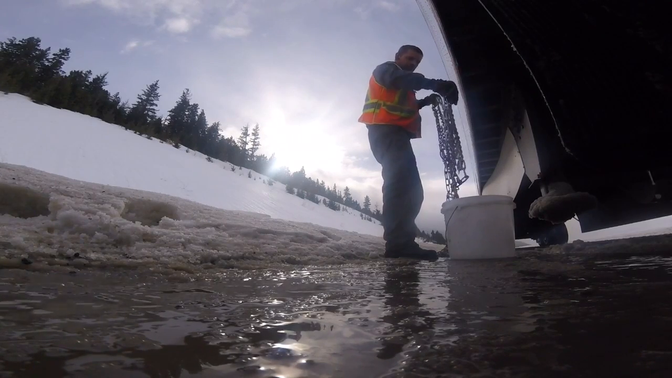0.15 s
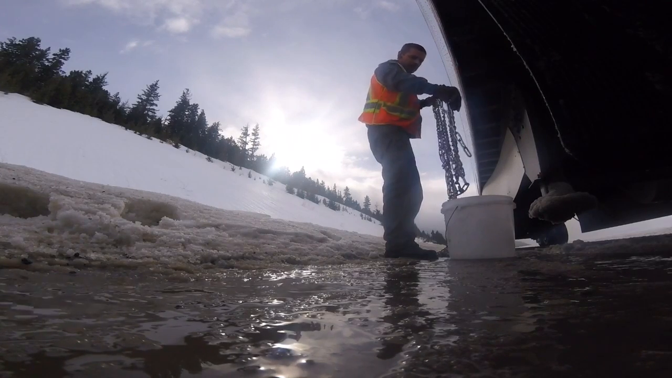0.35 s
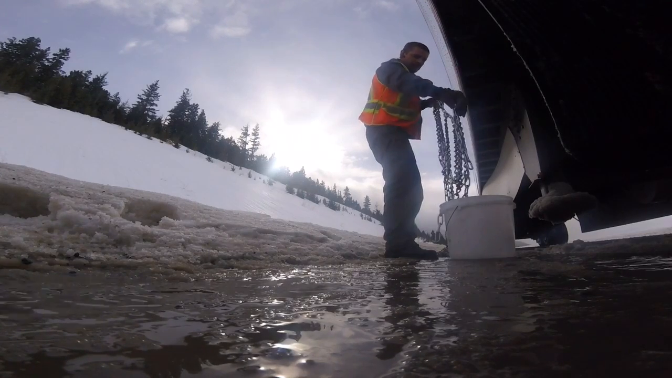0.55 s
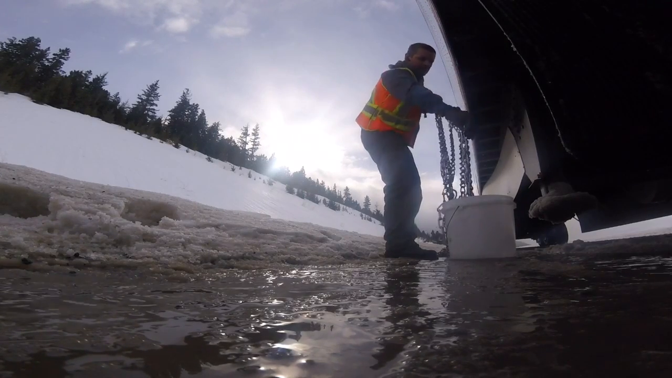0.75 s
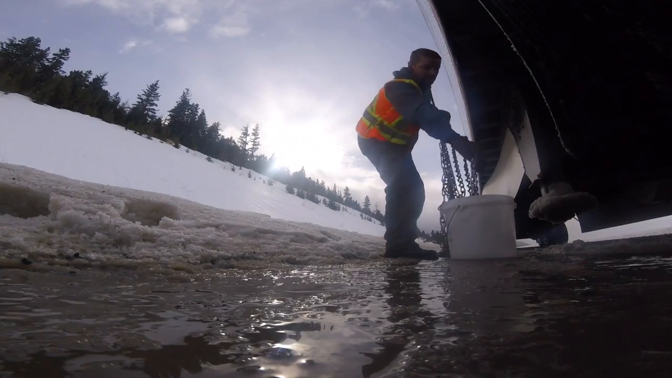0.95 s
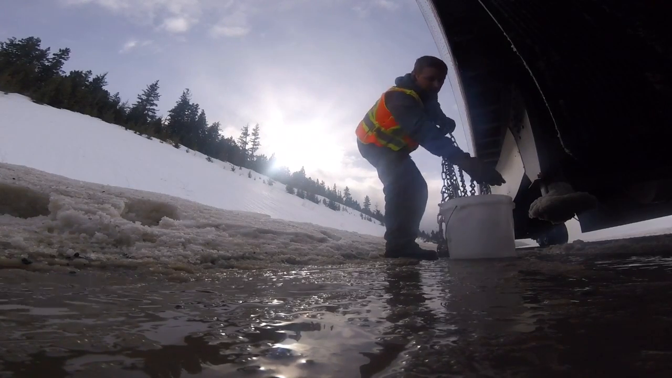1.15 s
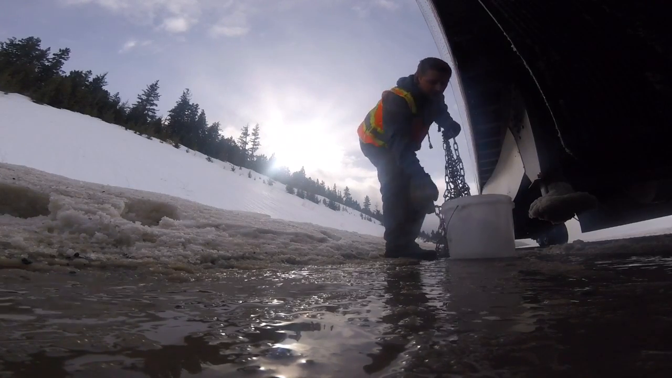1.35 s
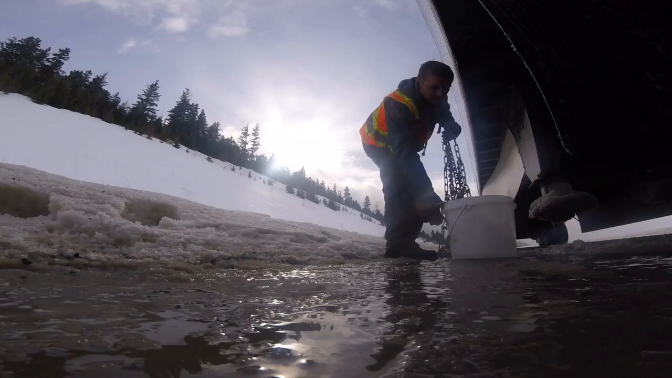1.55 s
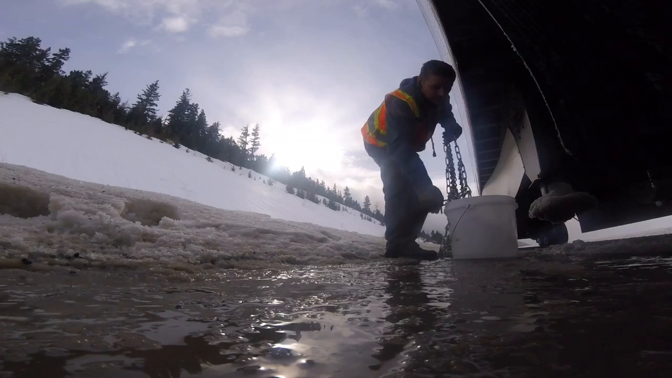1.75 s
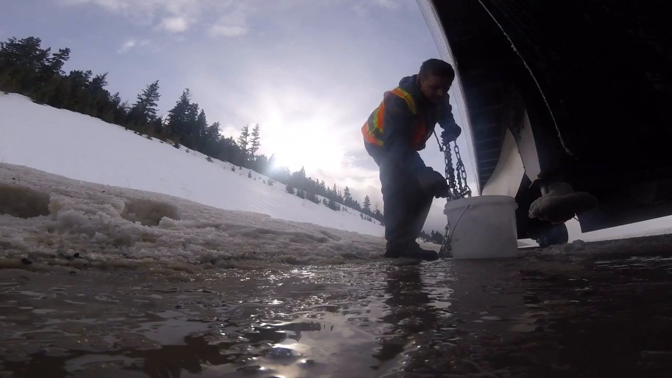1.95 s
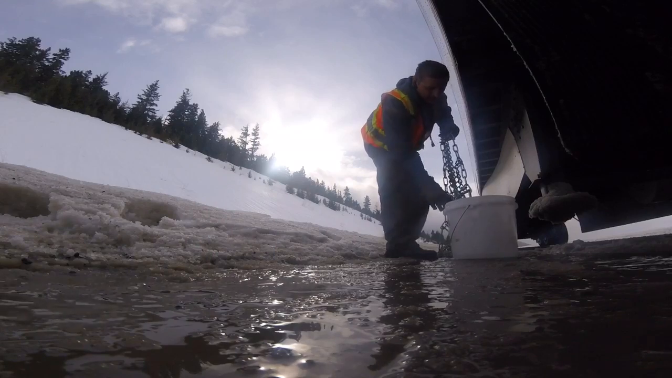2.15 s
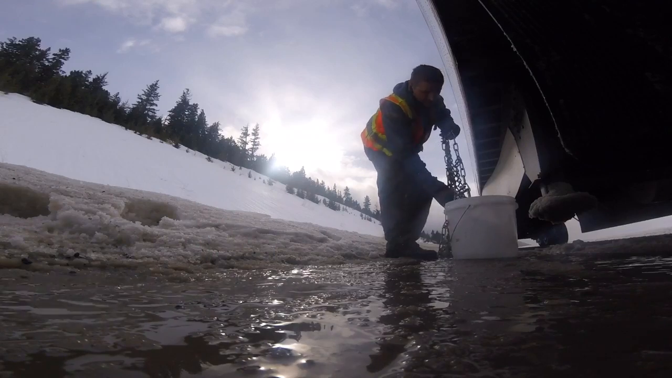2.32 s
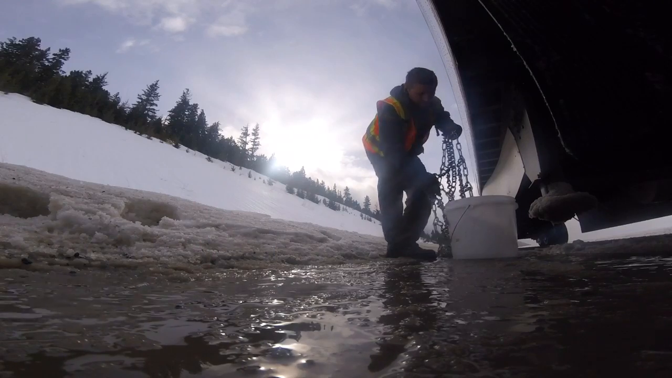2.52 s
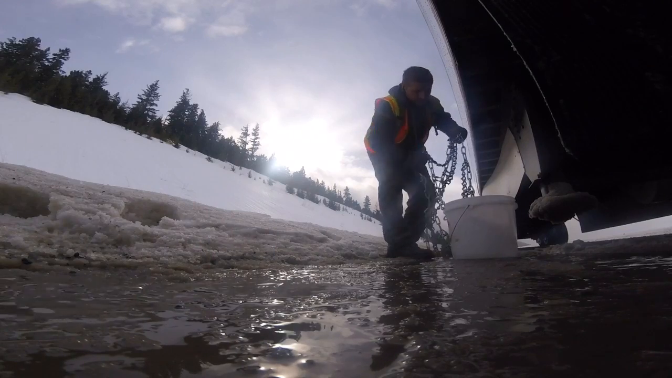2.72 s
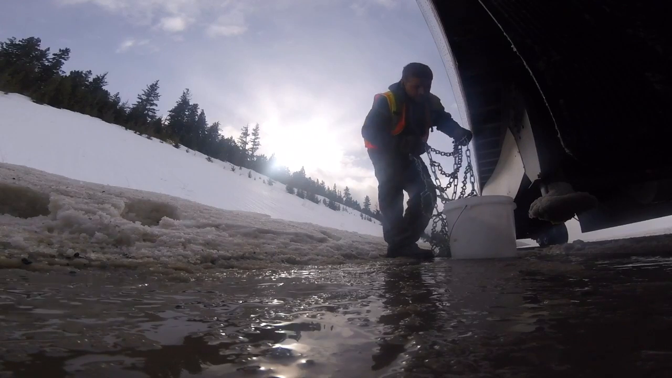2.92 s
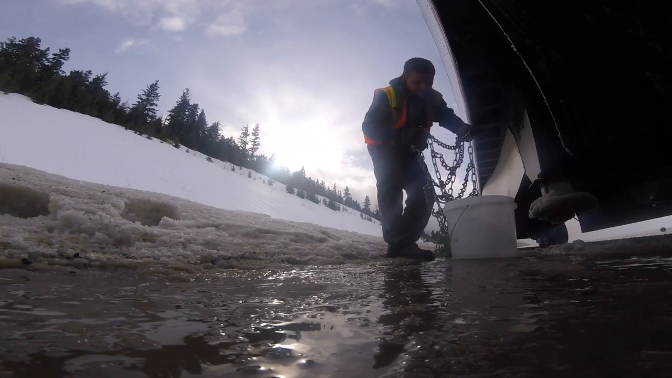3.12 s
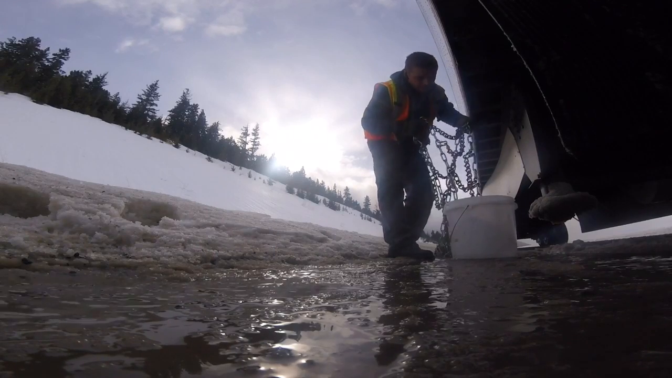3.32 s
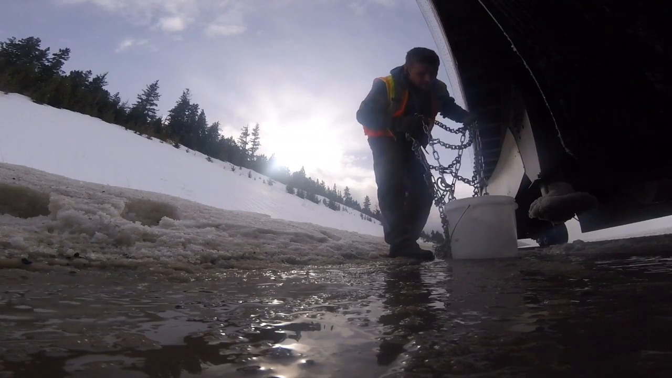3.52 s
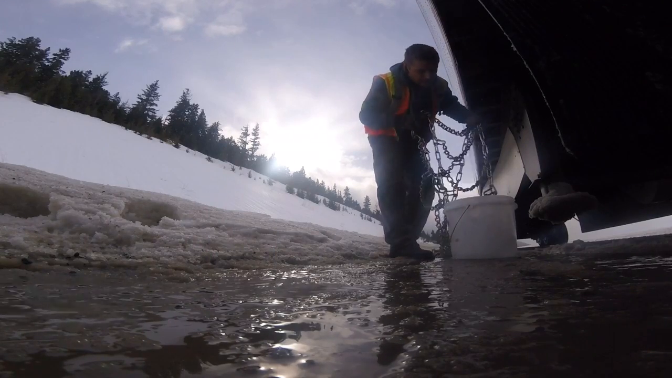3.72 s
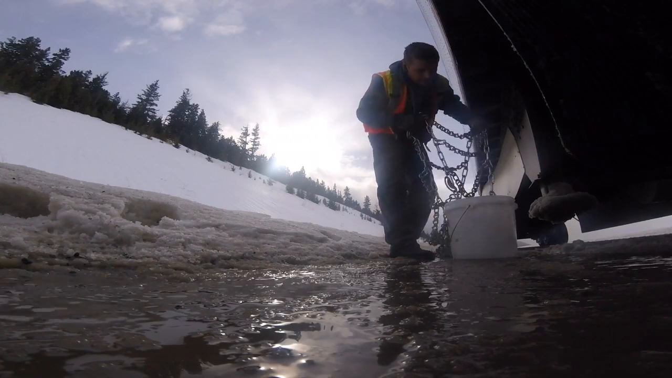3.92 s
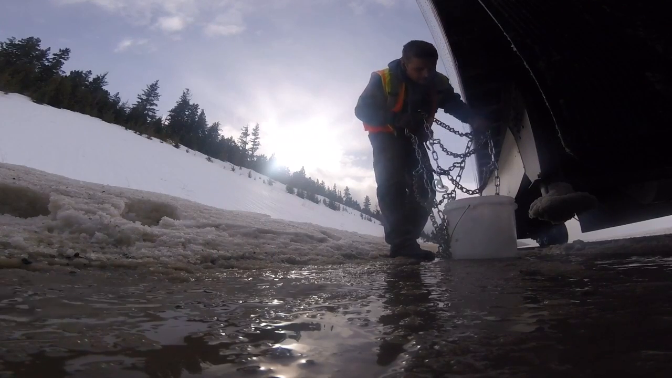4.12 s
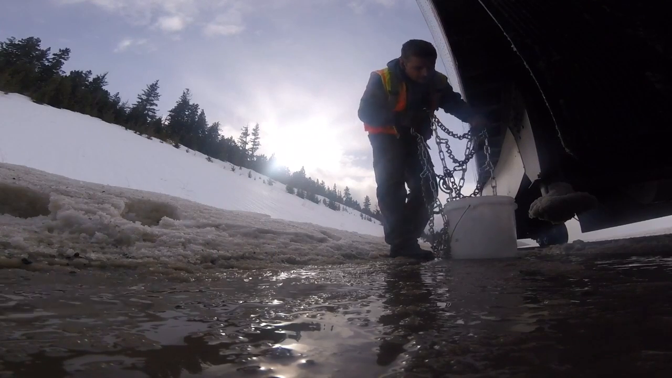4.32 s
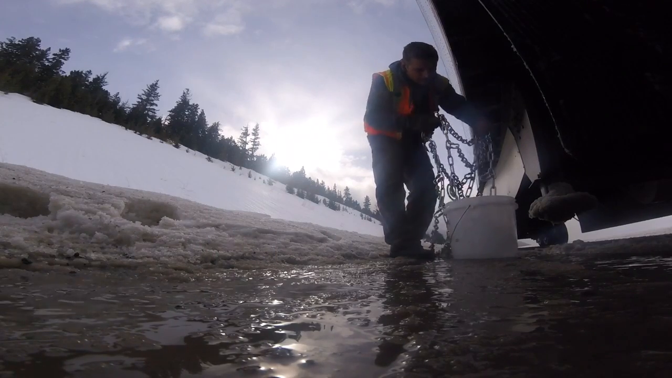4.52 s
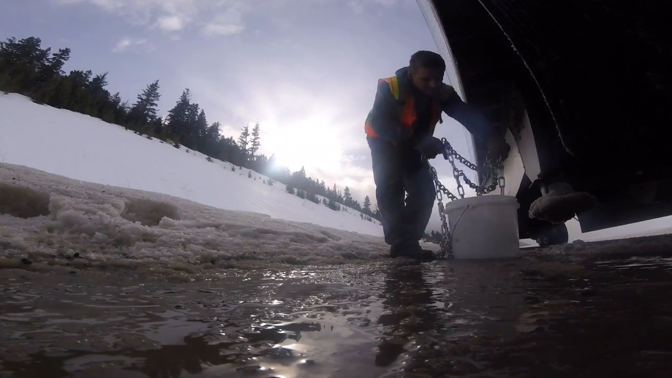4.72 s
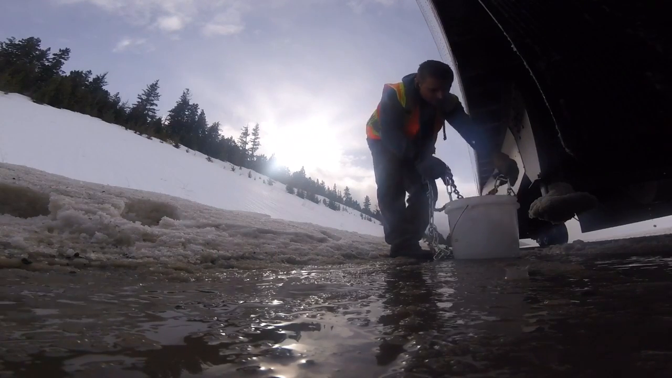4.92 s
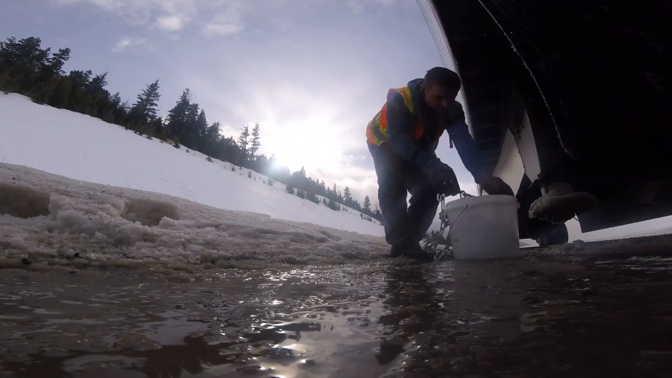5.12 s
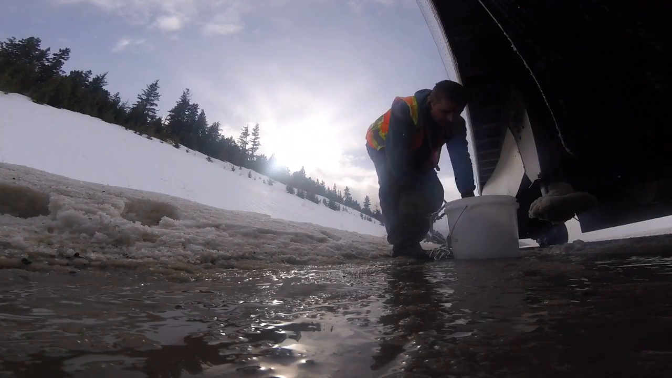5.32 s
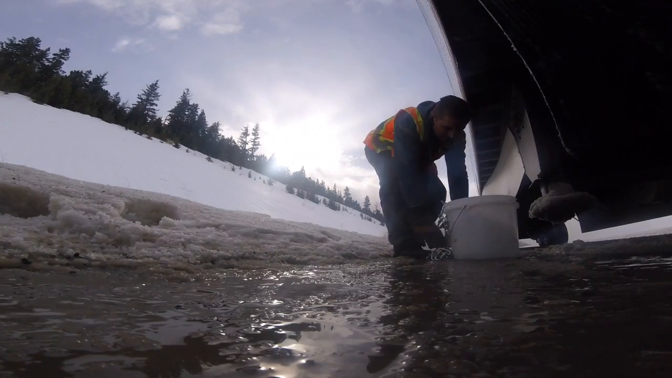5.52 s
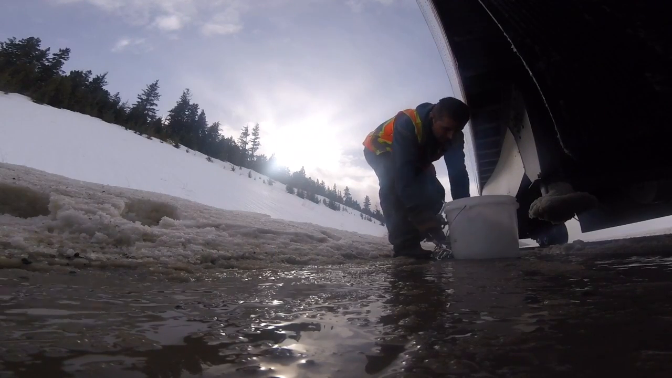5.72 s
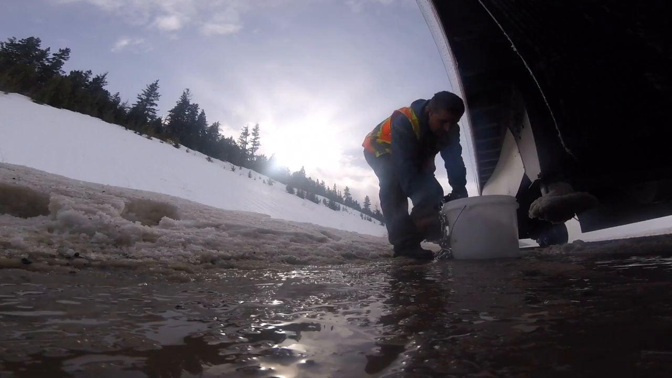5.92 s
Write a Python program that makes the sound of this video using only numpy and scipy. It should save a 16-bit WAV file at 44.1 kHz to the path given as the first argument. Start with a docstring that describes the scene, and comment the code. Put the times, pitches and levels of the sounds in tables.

```python
"""Wet roadside: over a low, gust-like outdoor rumble with soft bumps, steel tyre chains jingle and knock on a bucket.
From about 0.8 to 2.2 s lengths of chain drop thickly into the plastic bucket, and its bottom drums.
Then the blows thin out, free links ring clear and the rumble sinks, to return by 3.5 s.
From 4.5 to 5.3 s a second heavy run lands, then a few last knocks; the rumble is fullest at the end.
Noise blows drive wall, air and bottom resonances; links are decaying sines; the rumble is filtered noise."""
import sys
import numpy as np
from scipy import signal
from scipy.fft import rfft, irfft
from scipy.io import wavfile

SR = 44100
rng = np.random.default_rng(int(sys.argv[2]) if len(sys.argv) > 2 else 0)


def put_to_file(sound):
    """Save the sound as 16-bit audio at rate SR, in the file named by the first command-line argument."""
    columns = np.atleast_2d(sound).T  # one column per channel
    safe = np.clip(columns, -1, 1)
    whole_steps = np.round(safe * 32767)
    wavfile.write(sys.argv[1], SR, whole_steps.astype(np.int16))


N = 262836
TIME = np.arange(N) / SR


def undb(db):
    """Decibels to amplitude gain."""
    return 10 ** (np.asarray(db) / 20)


def unit(x):
    """Scale to rms 1."""
    return x / np.sqrt(np.mean(x ** 2))


def curve(table):
    """Gain over time from rows of (time [s], level [dB])."""
    rows = np.array(table)
    return undb(np.interp(TIME, rows[:, 0], rows[:, 1]))


def fade(t, t60):
    """Exponential decay, down 60 dB after t60 seconds."""
    return np.exp(-np.log(1000) * t / max(t60, 1e-3))


def swell(t, hold, attack, release_t60):
    """Rise from t = 0 over the attack, hold until hold + attack / 2, then die away exponentially."""
    rise = np.clip(t / max(attack, 1e-3), 0, 1)
    return rise * fade(np.maximum(t - hold - attack / 2, 0), release_t60)


def add(out, s, sound):
    """Mix a sound in at time s."""
    i = int(np.clip(s * SR, 0, N - 1))
    out[i:i + len(sound)] += sound[:N - i]


def through(x, response):
    """Pass a sound through an impulse response."""
    return signal.fftconvolve(x, response)[:len(x)]


def colour(points, size=1024):
    """Causal minimum-phase impulse response of a spectrum, with unit energy."""
    hz, db = np.transpose(points)
    f = np.maximum(np.fft.rfftfreq(size, 1 / SR), 1)
    log_gain = np.log(undb(np.interp(np.log(f), np.log(hz), db)))
    # folding the cepstrum onto positive time makes the response causal
    cepstrum = irfft(log_gain)
    cepstrum[1:size // 2] *= 2
    cepstrum[size // 2 + 1:] = 0
    return unit(irfft(np.exp(rfft(cepstrum)))) / np.sqrt(size)


def resonances(modes, size=12000):
    """Impulse response of damped modes, each with its dB as peak gain."""
    t = TIME[:size]
    response = np.zeros(size)
    for hz, width, db in modes:
        ring = np.exp(-np.pi * width * t) * np.cos(2 * np.pi * hz * t)
        response += undb(db) * 2 * np.pi * width / SR * ring
    return response


def contacts(rate, scatter_db):
    """Start samples and forces of uneven contacts, about rate a second; forces even out power across rates."""
    rate = np.broadcast_to(rate, N)
    turns = np.cumsum(rate) / SR
    when, strength = rng.standard_normal((4000, 2))[:int(turns[-1])].T
    starts = np.searchsorted(turns, np.arange(len(when)) + when / 2)
    starts = np.minimum(starts, N - 1)
    forces = unit(undb(scatter_db * np.clip(strength, -2, 2)))
    return starts, forces * np.sqrt(SR / rate[starts])


def scatter(sounds, hits, gain):
    """Play the sounds in turn, one at each contact; their rms level follows gain."""
    out = np.zeros(N)
    for k, (i, force) in enumerate(zip(*hits)):
        add(out, i / SR, sounds[k % len(sounds)] * force * gain[i])
    mean_energy = np.mean([np.sum(sound ** 2) for sound in sounds])
    return out / np.sqrt(mean_energy)


def bursts(table, attack, release_t60, rest_db, size=40000):
    """Gains over time of a main and a companion layer: one swell per row above a resting level."""
    main, companion = np.full((2, N), undb(rest_db) ** 2)
    for start, hold, db, companion_db in table:
        gain = undb(db) * swell(TIME[:size], hold, attack, release_t60)
        # overlapping swells add in power
        add(main, start, gain ** 2)
        add(companion, start, (gain * undb(companion_db)) ** 2)
    return np.sqrt(main), np.sqrt(companion)


def blow(crack_t60, tail_t60, tail_db, patchy_db, size=12000):
    """One blow: a tight crack, then chatter inside the bucket; every spot struck favours its own pitches."""
    t = TIME[:size]
    octaves = np.log2(np.maximum(np.fft.rfftfreq(size, 1 / SR), 1))
    spots = np.arange(6, 15, 1 / 12)  # log2 of Hz, in semitones
    favour = np.clip(rng.standard_normal(len(spots)), -2, 2)
    patches = undb(np.interp(octaves, spots, patchy_db * favour))
    grain = unit(irfft(rfft(rng.standard_normal(size)) * patches, size))
    # the links of one blow do not all arrive at once
    onset = 1 - fade(t, crack_t60 / 10)
    decay = fade(t, crack_t60) + undb(tail_db) * fade(t, tail_t60)
    return grain * onset * decay / (1 + undb(tail_db))


# outdoor rumble at the microphone, sinking and coming back: (time [s], level [dB])
RUMBLE_LEVEL = [(0.2, -29), (1.02, -28.5), (1.05, -37), (1.53, -34), (2.44, -42), (3.46, -30), (3.49, -34),
                (3.71, -28.5), (5.48, -27.5), (5.67, -30.5), (5.72, -27), (5.96, -24.5)]
# spectrum of the rumble and its faint hiss: (frequency [Hz], relative level [dB])
RUMBLE_SPECTRUM = [(15, -11), (30, -1), (50, -1), (95, 0), (125, -4), (152, -4.5), (175, -5), (230, -11),
                   (400, -23), (900, -23), (2000, -34), (6000, -50)]


def rumble(gust_db=1.0, gust_rate=16):
    """Low outdoor rumble: filtered noise in small uneven bumps, gust_rate random levels a second."""
    gusts = undb(gust_db * np.interp(TIME * gust_rate, np.arange(400), rng.standard_normal(400)))
    noise = through(rng.standard_normal(N), colour(RUMBLE_SPECTRUM, size=8192))
    return unit(noise * gusts) * curve(RUMBLE_LEVEL)


# soft low bumps in the rumble: (time [s], pitch [Hz], level [dB])
LOW_BUMPS = [(0.115, 72, -13.5), (0.346, 79.7, -18), (0.72, 84.9, -18), (1.48, 69.35, -21), (3.78, 55, -15),
             (4.02, 99.7, -26)]


def bumps(attack_s=.012, decay_t60=.13, size=10000):
    """Dull bumps, each a few low sine swings that die quickly."""
    out, t = np.zeros(N), TIME[:size]
    shape = swell(t, 0, attack_s, decay_t60)
    for s, hz, db in LOW_BUMPS:
        add(out, s, undb(db) * shape * np.sin(2 * np.pi * hz * t))
    return out


# ring modes of the links: (frequency [Hz], standard deviation from link to link [Hz], relative level [dB])
LINK_RING_MODES = [(6830, 49, -3), (7370, 37, -2.5), (7450, 66, -2), (8230, 330, -11.5), (8500, 68, 8.5),
                   (8280, 40, -9.5), (8710, 210, 9), (9350, 100, -6.5), (9505, 53, 3.5), (10334, 201, 3),
                   (10444, 114, -2)]


def link(size=8000):
    """One link with its own slightly different modes, ringing until a neighbour damps it."""
    hz, spread, db = np.transpose(LINK_RING_MODES)
    detune, spot = rng.standard_normal((2, len(hz)))
    # the point of contact decides which modes speak
    weights = unit(undb(db + 9 * spot))
    t60, rise_t60 = rng.uniform(.04, .16), .014  # s
    t = TIME[:size]
    modes = np.sin(2 * np.pi * np.outer(hz + spread * detune, t))
    return weights @ modes * fade(t, t60) * (1 - fade(t, rise_t60))


# tugs and shakes that set the hanging chain jingling, levels before the layer trim:
# (start [s], hold [s], ring level [dB], contact ticks relative to ring [dB])
CHAIN_SHAKES = [(0.0, 0.35, -45.5, -10), (0.498, 0.12, -44.5, -4), (0.619, 0.098, -31.5, -6.5),
                (0.757, 0.13, -28.0, -7), (0.95, 0.29, -33.0, -9), (1.257, 0.17, -37.5, -1.5),
                (1.535, 0.098, -40.0, -14), (1.826, 0.04, -39.5, -14), (1.952, 0.041, -34.0, -3.5),
                (2.053, 0.18, -42.5, -33), (2.429, 0.15, -44.5, 0), (2.591, 0.18, -35.0, -5.5),
                (2.819, 0.049, -34.5, -8.5), (2.993, 0.14, -44.5, -2), (3.209, 0.26, -44.5, -1),
                (3.514, 0.11, -41.0, 5), (3.6, 0.19, -36.0, -2.5), (3.834, 0.18, -45.5, 0.5),
                (4.035, 0.09, -41.5, 0), (4.198, 0.062, -39.5, -15), (4.385, 0.1, -50.0, 5.5),
                (4.481, 0.055, -33.0, -2), (4.551, 0.33, -23.0, -4), (4.93, 0.16, -28.0, -4.5),
                (5.066, 0.23, -25.5, -3.5), (5.323, 0.052, -32.5, -6), (5.467, 0.18, -36, -4),
                (5.754, 0.16, -28.5, -0.5)]
# spectrum of the contact ticks: (frequency [Hz], relative level [dB])
TICK_SPECTRUM = [(1000, -14), (2500, 1), (3700, -2.5), (4600, 4.5), (6500, 5.5), (7900, -2.5), (9200, 5.5),
                 (10600, -9)]
# the hanging chain never quite comes to rest: SWAY_DB is its resting level
SHAKE_ATTACK_S, SHAKE_RELEASE_T60, SWAY_DB = .03, .36, -58


def jingle(ring_db=-3.5, count=130):
    """Neighbouring links tick and ring against each other, more often the harder the chain is shaken."""
    effort, ticking = bursts(CHAIN_SHAKES, SHAKE_ATTACK_S, SHAKE_RELEASE_T60, SWAY_DB)
    rate = 70 + 560 * np.sqrt(effort / effort.max())  # contacts a second
    hits = contacts(rate, scatter_db=7.5)
    clicks = [blow(crack_t60=.005, tail_t60=.13, tail_db=-10, patchy_db=2.5, size=5000)
              for _ in range(count)]
    rings = scatter([link() for _ in range(count)], hits, effort)
    ticks = through(scatter(clicks, hits, ticking), colour(TICK_SPECTRUM))
    return undb(ring_db) * rings + ticks


# single links, now and then a heavier hook, swinging free and ringing out, levels before the layer trim:
# (time [s], pitch [Hz], level [dB], 60 dB decay time [s])
FREE_PINGS = [(.094, 7480, -36, 0.11), (.212, 7300, -46, .2), (.76, 8730, -29, 0.14),
              (.762, 8950, -26.5, 0.14), (1.648, 8840, -32, 0.06), (1.862, 8300, -37, 0.14),
              (2.113, 8670, -23.5, 0.18), (2.116, 9160, -27, 0.18), (2.221, 2475, -22, 0.054),
              (2.408, 8690, -36.5, 0.34), (2.524, 8570, -18, 0.096), (2.629, 7470, -32, 0.14),
              (2.703, 7310, -28, 0.13), (2.868, 8460, -25, 0.12), (3.113, 10480, -30, 0.079),
              (3.846, 2536, -25, 0.061), (5.025, 8580, -19.5, 0.14), (5.292, 8690, -25, 0.2)]


def pings(level_db=1, twin_db=-11, twin_hz=45, rise_t60=0.0083, size=14000):
    """A free link rings clearly, beating a little against the link that struck it."""
    out, t = np.zeros(N), TIME[:size]
    for s, hz, db, t60 in FREE_PINGS:
        twin = hz + twin_hz * rng.standard_normal()
        ring = np.sin(2 * np.pi * hz * t) + undb(twin_db) * np.sin(2 * np.pi * twin * t)
        add(out, s, undb(db) * ring * fade(t, t60) * (1 - fade(t, rise_t60)))
    return undb(level_db) * out


# spectrum of the bucket wall's broad answer: (frequency [Hz], relative level [dB])
WALL_SPECTRUM = [(150, -21.5), (240, 0), (340, 1.5), (450, -2.5), (620, -3), (850, 0.5), (1300, -1),
                 (1900, -1.5), (2600, -8), (3700, -14), (5000, -26), (8000, -38.5)]
# bucket wall resonances over that broad response: (frequency [Hz], width [Hz], peak gain [dB])
WALL_RESONANCES = [(590, 6.9, -21), (813, 32.5, 3.5), (1078, 11, -3), (1318, 39, -3), (1463, 21, 0.5),
                   (1787, 20, 2), (2100, 23, -31), (2314, 80, -4.5), (3275, 240, -3)]


def wall(force):
    """The plastic wall answers broadly, with a few short resonances on top."""
    broad = through(force, colour(WALL_SPECTRUM))
    return broad + through(broad, resonances(WALL_RESONANCES))


# lengths of chain striking the bucket, levels before the layer trims; these times also set the catches below:
# (time [s], level [dB], hollow boom relative to level [dB])
CHAIN_KNOCKS = [(0.048, -16.5, -15), (0.072, -16, 0.5), (0.139, -4.5, -28.5), (0.313, -22, 4),
                (0.376, -20.5, 8.5), (0.514, -17, 4.5), (0.649, -17, 2), (0.756, -6, -8), (0.803, -6, -6),
                (0.824, -9, -1), (0.946, -16.5, -13), (1.001, -11, -16), (1.053, -1.5, -14),
                (1.102, -11.0, -10), (1.117, -6.5, -17), (1.143, -6.5, -19), (1.159, -7, -6.5),
                (1.204, -9.0, -18), (1.217, -4, -3), (1.256, -6.5, -22), (1.274, -8.0, -28),
                (1.302, -5.5, -3), (1.345, -12, -24), (1.37, -12.5, -7), (1.406, -6.5, -9), (1.414, -7, -7),
                (1.438, -10.5, -13), (1.549, -13.5, -9), (1.572, -15.5, -13), (1.625, -17.5, -13),
                (1.666, -21.0, -15), (1.781, -25.5, -12), (1.838, -18, -11), (1.897, -22.5, -16),
                (1.994, -10.5, -13), (2.001, -8, -10), (2.088, -6.0, -28), (2.108, -1.5, -6.5),
                (2.131, -11, -28), (2.22, -15.5, -9), (2.757, -23.5, -16), (2.854, -19.5, -1.5),
                (2.991, -28.5, -11), (3.297, -23.0, -13), (3.334, -19.5, -9), (3.607, -10.5, -16),
                (3.635, -12.5, -11), (3.846, -14.5, -9), (4.034, -24.5, 12.5), (4.098, -20, -9),
                (4.209, -18, 0), (4.257, -18.5, -24), (4.283, -19.5, -16), (4.498, -13.0, 7.5),
                (4.562, -8.5, 6), (4.662, -7, -6), (4.685, -2, -8), (4.718, -3.5, -4), (4.744, -8.0, -7),
                (4.794, -3.5, -11), (4.813, -1.5, -21), (4.836, -3.5, -21), (4.862, -1, -11),
                (4.871, -9.5, -12), (4.923, -6, -14), (4.958, -3, 0.5), (5.109, -2, -30), (5.124, -8, -7),
                (5.186, -5.5, -1.5), (5.222, -4.5, -29), (5.289, -4.5, -19), (5.298, -3.5, -30),
                (5.511, -18.5, 1.5), (5.579, -11, -19), (5.697, -15.0, -14), (5.813, -13.5, -23)]


def feed(catch_s=.03, lead_s=.024, depth=.55):
    """The chain catches for an instant before each length lets go and drops."""
    flow = np.ones(N)
    dip = 1 - depth * np.hanning(int(catch_s * SR))
    for s, *_ in CHAIN_KNOCKS:
        i = int((s - lead_s) * SR)
        caught = flow[i:i + len(dip)]
        flow[i:i + len(dip)] = np.minimum(caught, dip)
    return flow


# air in the bucket and its flexing sides: (frequency [Hz], width [Hz], relative peak gain [dB])
HOLLOW_RESONANCES = [(245, 9.5, -2), (248, 13.5, 5), (265, 28, 1.5)]
# lengths of chain sliding onto the heap, levels before the layer trims:
# (start [s], hold [s], clatter level [dB], hollow boom relative to clatter [dB])
CHAIN_POURS = [(0.036, 0.061, -31.0, 2), (0.365, 0.32, -48, 10.5), (0.749, 0.12, -28.0, -0.5),
               (0.942, 0.13, -28.0, 0.5), (1.134, 0.27, -25, -6.5), (1.446, 0.073, -28.5, 1.5),
               (1.641, 0.38, -41.5, -2), (2.782, 0.09, -40.5, 0.5), (3.22, 0.14, -36, -3.5),
               (3.44, 0.073, -39.5, 1), (3.561, 0.11, -30, 1.5), (3.762, 0.44, -43, 1.5),
               (4.17, 0.322, -41.5, 2), (4.506, 0.18, -21.5, 2.5), (4.681, 0.26, -19.0, -10.5),
               (5.011, 0.21, -21.5, -9), (5.422, 0.28, -38.5, 0.5), (5.798, 0.15, -35.5, -4)]
# the heap goes on shifting a little between pours, at SETTLE_DB
POUR_ATTACK_S, POUR_RELEASE_T60, SETTLE_DB = 0.036, 0.36, -55


def pour(clatter_db=-3, boom_db=-2.5, count=70):
    """Links tumble one over another onto the heap, rattle the bucket wall and push its air."""
    landings = [blow(crack_t60=.011, tail_t60=.13, tail_db=-15, patchy_db=5.5, size=6000)
                for _ in range(count)]
    flow, weight = bursts(CHAIN_POURS, POUR_ATTACK_S, POUR_RELEASE_T60, SETTLE_DB)
    clatter = wall(scatter(landings, contacts(rate=300, scatter_db=1.0), flow * feed()))
    # keep the boom close around the air resonance
    band = colour([(120, -36.5), (220, 2.5), (290, 2.0), (500, -30.5)])
    hollow = unit(through(resonances(HOLLOW_RESONANCES), band))
    pushes = scatter(landings, contacts(rate=80, scatter_db=2.5), weight)
    boom = through(pushes, hollow / np.sqrt(len(hollow)))
    return undb(clatter_db) * clatter + undb(boom_db) * boom


# the bottom drums most from BARE_START_S, until the heap covers it; BARE_DB comes on top of COVERED_DB
BARE_START_S, BARE_HOLD_S, BARE_DB, COVERED_DB, COVER_T60 = 1.047, 0.47, 6, -11.5, 1.1


def bare_bottom():
    """Gain over time of the blows that reach the bottom of the bucket."""
    bare = swell(TIME - BARE_START_S, BARE_HOLD_S, POUR_ATTACK_S, COVER_T60)
    return undb(COVERED_DB) + undb(BARE_DB) * bare


# drum modes of the bottom: (frequency [Hz], width [Hz], peak gain [dB])
BOTTOM_DRUM_MODES = [(324, 33, -15), (436, 41, -3.5), (497, 30, -7.5), (554, 9.3, 0.5)]
# spectrum of the hard edge of a knock: (frequency [Hz], relative level [dB])
EDGE_SPECTRUM = [(1500, -47), (3000, -4), (4500, 10), (6300, 12), (8000, -2), (11000, -12)]
# blows harder than TIGHT_DB land as one crack; each dB below it lengthens the crack by LOOSE_PER_DB
TIGHT_DB, LOOSE_PER_DB = -8, 0.08


def knocks(wall_db=-7.5, boom_db=-3.0, edge_db=-21, edge_growth=0.86):
    """Lengths of chain hit the bucket: wall clatter, a hard edge, the bottom's drum and a push on the air inside."""
    clatter, edge, push = np.zeros((3, N))
    crack_t60 = .038  # s, for a tight blow
    tail = dict(tail_t60=.25, tail_db=-10, patchy_db=3)
    for s, db, boom_re_db in CHAIN_KNOCKS:
        # a slow, light landing spreads its links over a longer time
        spread = max(1 + LOOSE_PER_DB * (TIGHT_DB - db), 1)
        add(clatter, s, undb(db) / np.sqrt(spread) * blow(crack_t60 * spread, **tail))
        # the hard edge grows more slowly than the clatter, so light knocks sound brighter
        add(edge, s, undb(edge_growth * db) / np.sqrt(spread) * blow(crack_t60 * spread, **tail))
        add(push, s, undb([db + boom_re_db]))
    # the air takes a moment to swing up, so the boom starts without a click
    hollow = resonances(HOLLOW_RESONANCES)
    hollow = hollow / np.max(hollow) * (1 - fade(TIME[:len(hollow)], crack_t60 / 2))
    boom = through(push, hollow)
    floor_blows = through(clatter * bare_bottom(), colour(WALL_SPECTRUM))
    drum = through(floor_blows, resonances(BOTTOM_DRUM_MODES))
    hard_edge = through(edge, colour(EDGE_SPECTRUM))
    return undb(wall_db) * wall(clatter) + undb(boom_db) * boom + undb(edge_db) * hard_edge + drum


def roadside_echo(chain, echo_db=-21, echo_t60=0.084, size=16000):
    """Road and truck side throw the chain back faintly: decaying noise that starts after 6 ms."""
    t = TIME[:size]
    tail = rng.standard_normal(size) * fade(t, echo_t60) * (t > .006)
    return undb(echo_db) * through(chain, unit(tail) / np.sqrt(size))


def scene():
    """Chain and bucket with their roadside echo, over the rumble and its bumps; one channel."""
    chain = knocks() + pour() + jingle() + pings()
    return (chain + roadside_echo(chain) + rumble() + bumps())[None]


def record(dry, top_hz=10850):
    """The camera's microphone channel rounds the highest peaks, then cuts the top above top_hz."""
    low_pass = signal.ellip(10, .2, 70, top_hz, fs=SR, output="sos")
    return signal.sosfilt(low_pass, np.tanh(dry))


dry = scene()
out = record(dry)
put_to_file(out)
```